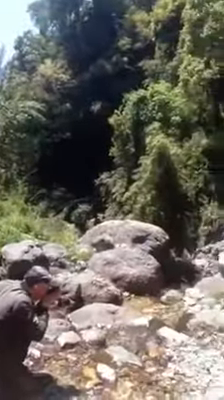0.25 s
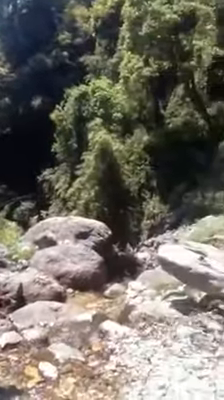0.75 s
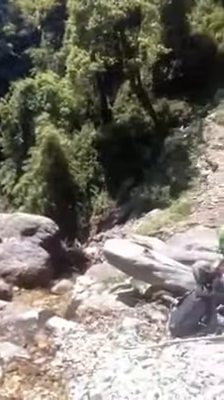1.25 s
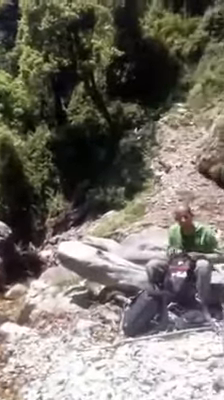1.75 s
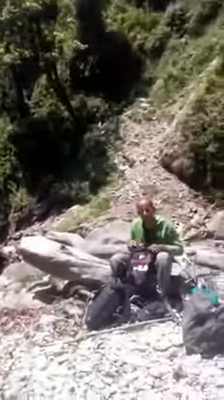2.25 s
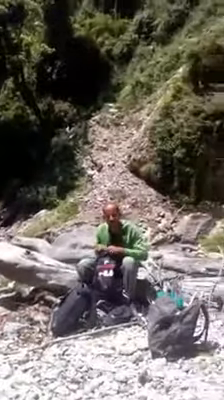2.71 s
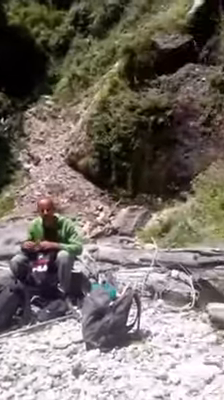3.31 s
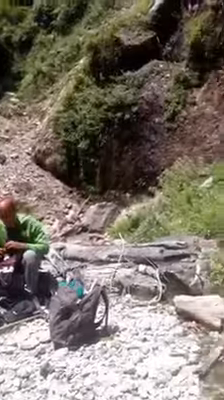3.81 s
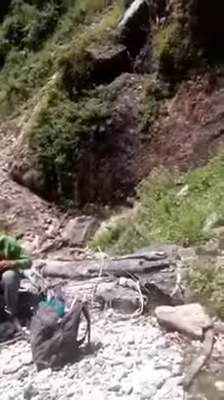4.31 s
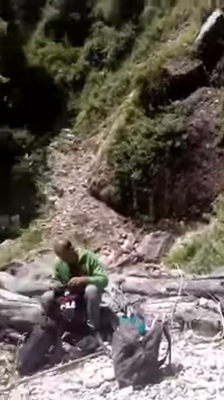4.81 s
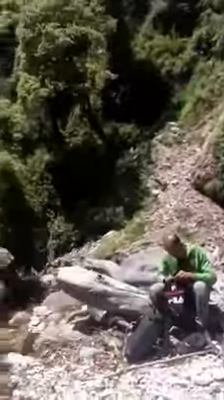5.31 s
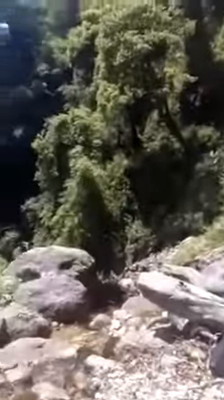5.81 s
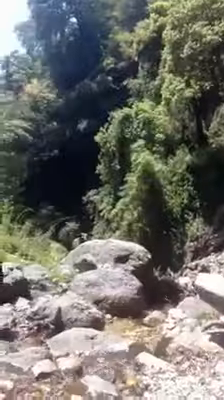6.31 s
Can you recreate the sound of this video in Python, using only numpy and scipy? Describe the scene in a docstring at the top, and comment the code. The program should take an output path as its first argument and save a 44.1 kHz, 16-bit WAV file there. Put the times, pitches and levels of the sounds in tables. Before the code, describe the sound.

Continuous rush of falling water outdoors: hissing spray over a rumbling, bubbling plunge pool, with occasional deep gulps as the microphones turn away and back.

```python
"""Rocky gorge, stony bank: a tall, narrow waterfall plunges into a pool.
Air under the pool booms as noise in low resonances; bubbles and noise churn and splash; spray hisses.
Now and then a large pocket gulps (wavering tone) or a slug of water gushes (burst of banded noise).
Faint low noise, separate in each channel, swells and fades. The hand-held microphones turn away and
back: splashes fade and return, spray shifts between the ears and varies in level and brightness."""
import sys
import numpy as np
from scipy import signal
from scipy.fft import rfft, irfft, next_fast_len
from scipy.io import wavfile
from scipy.ndimage import uniform_filter1d, map_coordinates

SR = 44100
rng = np.random.default_rng(int(sys.argv[2]) if len(sys.argv) > 2 else 0)


def int16_out(signal):
    """Quantize to a 16-bit WAV file."""
    q = np.round(np.clip(np.atleast_2d(signal).T, -1, 1) * 32767)
    wavfile.write(sys.argv[1], SR, q.astype(np.int16))


N = 288855
TOP_HZ = 10750


def amp(db):
    """Decibels to gain."""
    return 10 ** (np.asarray(db) / 20)


def unit(pair):
    """A stereo pair scaled so that its middle has rms 1."""
    middle = pair.mean(0)
    return pair / np.sqrt(np.mean(middle ** 2) + 1e-20)


def along(points, hz):
    """(Hz, value) points interpolated on a log frequency axis."""
    point_hz, value = np.transpose(points)
    return np.interp(np.log(hz + 1), np.log(point_hz + 1), value)


def curves(rows):
    """One value per sample for each column after the time."""
    time_s, *columns = np.transpose(rows)
    return [np.interp(np.arange(N) / SR, time_s, column) for column in columns]


def wobble(rate_hz):
    """A smooth random curve through rate_hz knots a second."""
    knots = rng.standard_normal(int(N * rate_hz / SR) + 4)
    return map_coordinates(knots, [np.arange(N) * rate_hz / SR])


def swell(at_s, width_s):
    """A smooth rise and fall of height 1 around a moment; 1/e at width_s either side."""
    return np.exp(-((np.arange(N) / SR - at_s) / width_s) ** 2)


def filtered(x, response):
    """x filtered by a gain that depends on frequency."""
    padded = next_fast_len(N + SR // 2)
    spectrum = rfft(x, padded)
    return irfft(spectrum * response(np.fft.rfftfreq(padded, 1 / SR)), padded)[..., :N]


def rush(patchy_db):
    """Two unrelated noises whose level varies in shared short patches of time and pitch."""
    z = signal.stft(rng.standard_normal((2, N)), nperseg=512)[2]
    field = uniform_filter1d(rng.standard_normal(z.shape[1:]), size=8, axis=0)
    field = uniform_filter1d(field, size=14, axis=1)
    patchy = z * amp(patchy_db * field / field.std())
    return unit(signal.istft(patchy, nperseg=512)[1][:, :N])


def bubbles(count, hz, spread, cycles, size_db, rise, size=300):
    """Two streams of damped rings, size samples long; each climbs in pitch as its bubble nears the surface."""
    t = np.arange(size) / SR
    start = rng.integers(0, N, (count, 1))
    port = rng.integers(0, 2, (count, 1))
    pitch_hz = np.minimum(hz * np.exp(spread * rng.standard_normal((count, 1))), TOP_HZ)
    strength = amp(size_db * np.minimum(rng.exponential(size=(count, 1)), 4))
    age = t * pitch_hz / cycles
    climb = 1 + rise * np.minimum(age, 2) / 2
    ring = strength * np.exp(-2 * age) * np.sin(2 * np.pi * pitch_hz * t * climb)
    ring = ring * (1 - t / t[-1])  # ends at zero
    index = port * N + (start + np.arange(size)) % N
    return unit(np.bincount(index.ravel(), ring.ravel(), 2 * N).reshape(2, N))


# Level difference of the two ports. Each row: frequency in Hz, left over right in dB.
PORT_BALANCE = [(500, -0.5), (950, -0.5), (1400, 1), (1900, 5), (2400, 9), (3100, 4.5), (3800, 1),
                (4700, -0.5), (5600, -3.5), (7000, 0), (10000, -1)]


def ports(pair):
    """The left port is louder in part of the treble; long waves bend round the case and reach both equally."""
    def response(hz):
        short_waves = hz ** 4 / (hz ** 4 + 500 ** 4)
        gains = amp(np.outer([.5, -.5], short_waves * along(PORT_BALANCE, hz)))
        return gains / np.sqrt(np.mean(gains ** 2, axis=0))

    return unit(filtered(pair, response))


# Spread of surrounding sound. Each row: frequency in Hz, side over middle in dB.
SURROUND_WIDTH = [(170, -54), (280, -28.5), (430, -15), (620, -9.5), (1000, -7.5), (1600, -6.5),
                  (2400, -0.5), (3300, -1.5), (4500, 0.6), (7000, -1.2)]


def heard(pair, colour):
    """Sound from all round the gorge at two close ports: alike in the bass, less alike in the treble."""
    def response(hz):
        return colour(hz) * np.array([np.ones_like(hz), amp(along(SURROUND_WIDTH, hz))])

    mid, side = filtered(pair, response)
    return ports(np.array([mid + side, mid - side]))


# Resonant air pockets under the fall. Each row: centre in Hz, width in Hz, relative level in dB.
POCKETS = [(95.4, 28, 0), (131.4, 39, 0.5), (147.7, 11, 2), (186, 25, -1), (215, 19, -0.5), (235.5, 15, 2),
           (279.3, 38, 1), (394, 70, -4.5)]
# Spectrum of the rumble. Each row: frequency in Hz, relative level in dB.
RUMBLE = [(8, -40), (22, -19), (38, -18), (65, -15.5), (90, -4), (200, 3.5), (330, -0.5), (480, 0),
          (800, -2), (1600, -45.5)]


def plunge(rumble_db=-4, throb_db=0.74, swell_db=1.5, drift=0.01984):
    """The jet drives air under the pool: each pocket swells, booms and drifts in pitch over a broad rumble."""
    def pocket(centre_hz, width_hz):
        ring = filtered(rng.standard_normal(N), lambda hz: 1 / (1 + (2 * (hz - centre_hz) / width_hz) ** 2))
        read_at = np.cumsum(1 + drift * wobble(6))
        drifting = map_coordinates(ring, [read_at], order=1, mode="mirror")
        return drifting * amp(swell_db * wobble(5))

    booms = sum(amp(db) * pocket(centre_hz, width_hz) for centre_hz, width_hz, db in POCKETS)
    rumble = filtered(rng.standard_normal((2, N)), lambda hz: amp(rumble_db + along(RUMBLE, hz)))
    # booms in the middle only; the rumble spreads round the gorge
    pair = np.array([rumble[0] + booms, rumble[1]])
    return heard(pair, np.ones_like) * amp(throb_db * wobble(13))


# Spectral weighting of the foam. Each row: frequency in Hz, gain in dB.
CHURN = [(150, -23), (350, 2.7), (520, -5.5), (780, -2.8), (1100, -1), (1500, -2.5), (2200, 0), (4000, -42)]


def churn(bubble_db=-7):
    """Foaming water round the foot of the fall gurgles with larger, longer-ringing bubbles."""
    gurgle = bubbles(count=3200, hz=900.5, spread=0.448, cycles=14, size_db=0.2, rise=0.13, size=1500)
    foam = rush(patchy_db=0.5) + amp(bubble_db) * gurgle
    return heard(foam, lambda hz: amp(along(CHURN, hz)))


# Microphones turning away and back. Each row: time in seconds, heading in degrees.
TURN = [(0, 11), (0.45, 17), (1.5, 24), (3.5, 39), (4.35, 48), (5.05, 30), (5.75, 26), (6.5, 21)]
# Spectral weighting of the near splashes. Each row: frequency in Hz, gain in dB.
SPLASH = [(350, -14.5), (700, -0.5), (1400, -4), (1900, -1), (2400, -6.5), (3200, -8), (4200, 3),
          (5200, -11), (6800, -24), (8000, -46)]
SPLASH_DB_PER_DEGREE = -0.104
LEAD_S, LEAD_S_PER_DEGREE = 0.00021, -0.000001  # left port ahead of right


def splashes(clump_db=1.0, drop_db=0):
    """The nearest water splashes in clumps of ringing droplets, straight from the left: left port first."""
    droplets = bubbles(count=5000, hz=2533, spread=0.452, cycles=8.7, size_db=0.8, rise=0.11, size=600)
    drops = rush(patchy_db=0.5) + amp(drop_db) * droplets
    water = filtered(drops.mean(0), lambda hz: amp(along(SPLASH, hz))) * amp(clump_db * wobble(35))
    heading_deg, = curves(TURN)
    lead_samples = SR * (LEAD_S + LEAD_S_PER_DEGREE * heading_deg)
    pair = np.array([map_coordinates(water, [np.arange(N) + side * lead_samples]) for side in (.5, -.5)])
    return amp(SPLASH_DB_PER_DEGREE * heading_deg) * ports(pair)


# Spectral weighting of the spray. Each row: frequency in Hz, gain in dB.
SPRAY = [(600, -16), (1200, -6.5), (1800, -2.5), (2400, 1), (3300, -0.96), (4300, -2), (5000, -4),
         (5600, -7.5), (6500, -10), (6900, -17.5), (7350, -19), (7900, -34), (9300, -28), (10600, -42)]
# Spray pickup. Each row: time in seconds, relative spray level in dB, fine mist over spray in dB.
HISS = [(0, 1.4, 2.5), (0.25, 2, 1.3), (0.55, 2.5, 0.8), (1.05, 0.5, 2.5), (1.45, -0.8, 1.5),
        (2.2, 0.2, -2), (2.45, 1.4, -2), (2.7, 0.5, -1.5), (2.9, 1.5, -2), (3.25, 0.2, -2.5),
        (3.5, -1.5, -1.5), (3.9, -1.8, 0.5), (4.45, -1.3, 1), (4.8, 0, -0.5), (5.02, 1.1, -2),
        (5.6, -0.8, 0), (5.9, -0.4, 3), (6.2, -0.3, 3.5), (6.48, 1.6, 2)]
PAN_DB_PER_DEGREE = -0.1054  # slides right as the heading grows


def spray(drop_db=-11, flutter_db=0.26, mist_hz=4200):
    """Countless drops burst on rock and water; the finest hiss follows its own level curve."""
    level_db, mist_db = curves(HISS)
    heading_deg, = curves(TURN)
    pan_db = PAN_DB_PER_DEGREE * (heading_deg - heading_deg.mean())
    bursts = bubbles(count=16000, hz=4340, spread=0.28, cycles=1.4, size_db=-0.5, rise=0.04)
    drops = rush(patchy_db=1.08) + amp(drop_db) * bursts
    hiss = heard(drops, lambda hz: amp(along(SPRAY, hz)))
    mist = filtered(hiss, lambda hz: hz ** 4 / (hz ** 4 + mist_hz ** 4))
    sides = amp(np.outer([.5, -.5], pan_db))
    return (hiss + (amp(mist_db) - 1) * mist) * sides * amp(level_db + flutter_db * wobble(14))


# Large air pockets. Each row: top in seconds, length in seconds, mean pitch in Hz, nominal peak in dB.
GULPS = [(0.238, 0.054, 135, -38.5), (0.468, 0.24, 150, -42), (0.6, 0.12, 205, -44),
         (0.797, 0.14, 230, -41.5), (0.92, 0.18, 277.5, -41), (1.05, 0.14, 232, -42),
         (2.193, 0.082, 260, -40), (2.52, 0.082, 389, -44), (2.86, 0.15, 232, -44), (2.967, 0.07, 275, -45),
         (3.66, 0.13, 147, -46), (3.945, 0.079, 151.7, -44), (4.02, 0.1, 233, -52), (4.46, 0.14, 138, -47),
         (4.9, 0.15, 233, -48), (5.37, 0.12, 220, -53), (5.86, 0.14, 227, -41.5), (5.92, 0.18, 395, -47.5),
         (6.486, 0.1, 370, -49.5)]


def gulps(waver=0.0322, rough_db=2):
    """Now and then one large air pocket booms on its own, wavering in pitch and level."""
    out = np.zeros(N)
    for top_s, length_s, pitch_hz, peak_db in GULPS:
        phase = 2 * np.pi * np.cumsum(pitch_hz * (1 + waver * wobble(25))) / SR
        level = amp(peak_db + rough_db * wobble(30)) * swell(top_s, length_s / 2)
        out += level * np.sin(phase)
    return out


# Slugs of water. Each row: top in seconds, length in seconds, band centre in Hz, nominal peak rms in dB.
GUSHES = [(0.327, 0.073, 1400, -41), (0.442, 0.07, 2470, -34), (3.31, 0.12, 2450, -43),
          (5.12, 0.67, 2400, -44), (5.5, 0.2, 810, -43.5), (6.46, 0.12, 1450, -50)]


def gushes(octaves=0.28, burble_db=0.5):
    """A heavier slug lands: a burbling cloud of like-sized bubbles, made as a brief band of noise."""
    out = np.zeros((2, N))
    for top_s, length_s, centre_hz, peak_db in GUSHES:
        cloud = heard(rng.standard_normal((2, N)),
                      lambda hz: np.exp(-(np.log2((hz + 1) / centre_hz) / octaves) ** 2))
        out += amp(peak_db + burble_db * wobble(45)) * swell(top_s, length_s / 2) * cloud
    return out


# Low noise swells. Each row: top in seconds, length in seconds, peak rms in dB.
LOW_SWELLS = [(1.48, 0.22, -57), (1.78, 0.37, -58), (4.127, 0.15, -61), (4.8, 0.11, -70), (5.65, 0.35, -66)]


def low_noise(centre_hz=55, width_hz=60):
    """Faint low noise, separate in each channel, swells and fades with an uneven level."""
    def response(hz):
        return np.sqrt(np.minimum(hz / centre_hz, 1)) / (1 + (2 * (hz - centre_hz) / width_hz) ** 2)

    low_band = filtered(rng.standard_normal((2, N)), response)
    flutter = amp(2.5 * np.array([wobble(8), wobble(8)]))
    strength = sum(amp(peak_db) * swell(top_s, length_s / 2) for top_s, length_s, peak_db in LOW_SWELLS)
    return strength * unit(low_band * flutter)


# Strength of the falling water. Each row: time in seconds, level in dB.
FLOW = [(0.0, -40.3), (0.35, -41.5), (1.11, -42), (2.19, -43), (2.85, -42), (3.6, -43), (4.0, -42),
        (4.5, -42), (5.4, -41), (6.26, -44), (6.55, -43)]
PLUNGE_DB, SPRAY_DB = -40.5, -33.5  # base levels
CHURN_DB = -0.95  # relative to the flow
SPLASH_DB = -42  # at heading 0
PLUNGE_FOLLOWS = 0.56  # share of flow changes in dB that reaches the plunge


def scene():
    """The flow drives the churn and, less so, the plunge; the other layers keep their own levels."""
    flow_db, = curves(FLOW)
    plunge_db = PLUNGE_DB + PLUNGE_FOLLOWS * (flow_db - flow_db.mean())
    pool = amp(plunge_db) * plunge() + gulps()
    surface = amp(flow_db + CHURN_DB) * churn() + amp(SPLASH_DB) * splashes() + gushes()
    return pool + surface + amp(SPRAY_DB) * spray() + low_noise()


def record(dry):
    """The recorder keeps nothing above its band limit."""
    return filtered(dry, lambda hz: hz < TOP_HZ)


dry = scene()
out = record(dry)
int16_out(out)
```